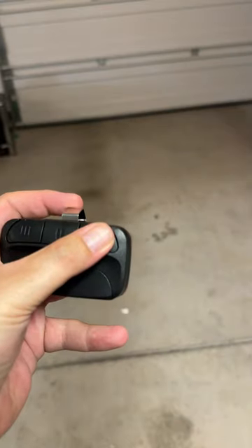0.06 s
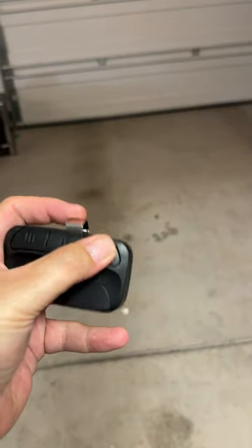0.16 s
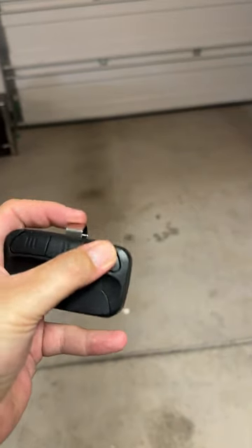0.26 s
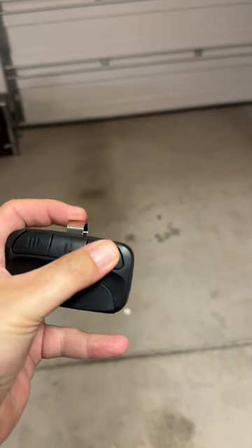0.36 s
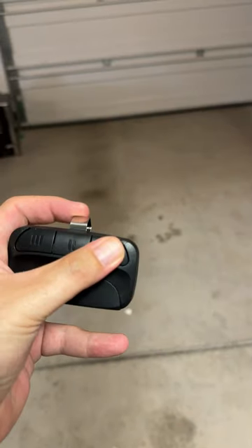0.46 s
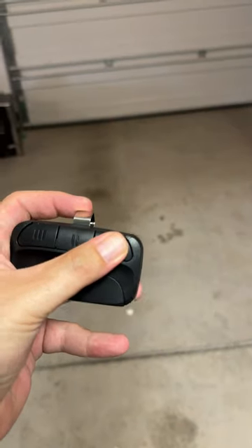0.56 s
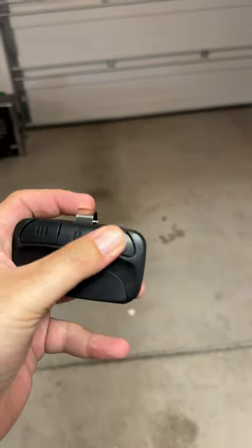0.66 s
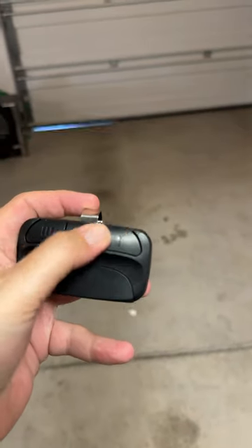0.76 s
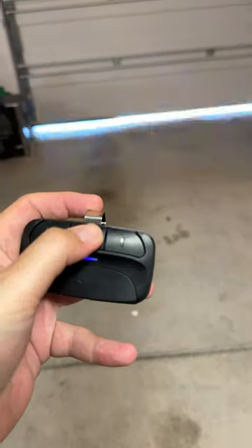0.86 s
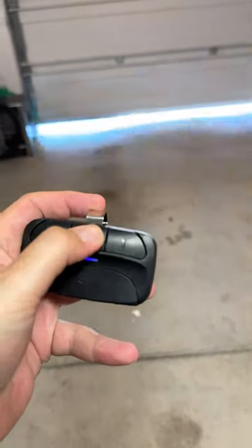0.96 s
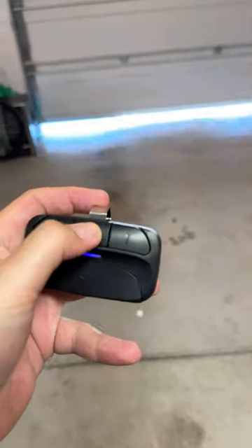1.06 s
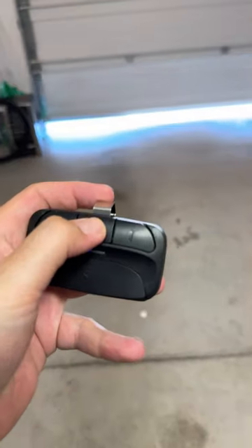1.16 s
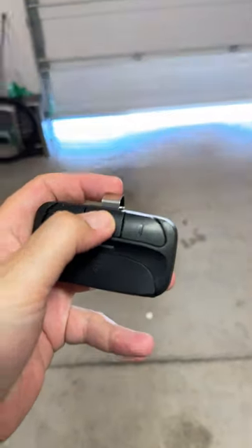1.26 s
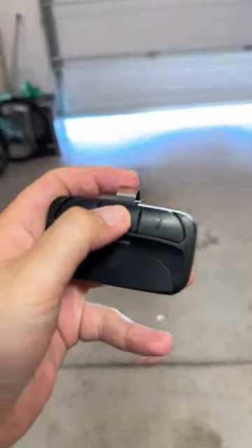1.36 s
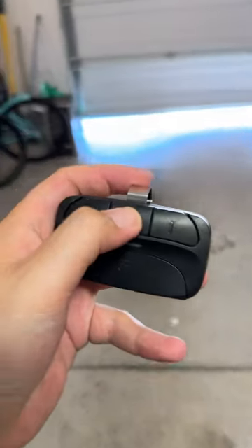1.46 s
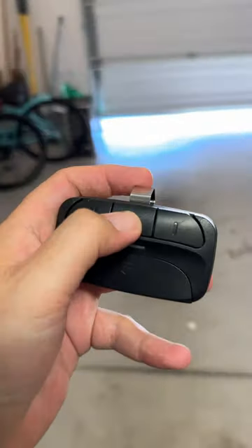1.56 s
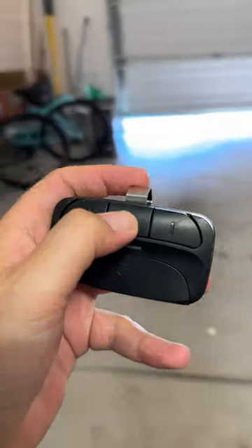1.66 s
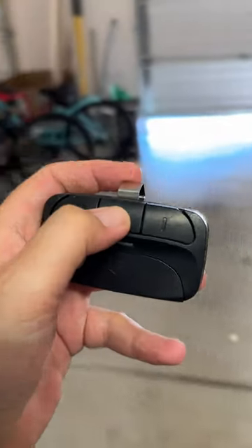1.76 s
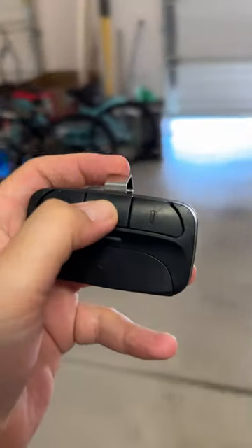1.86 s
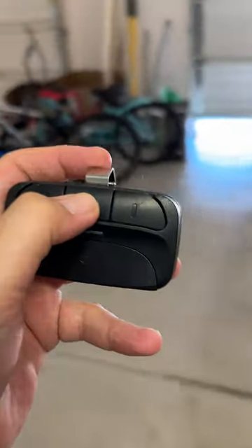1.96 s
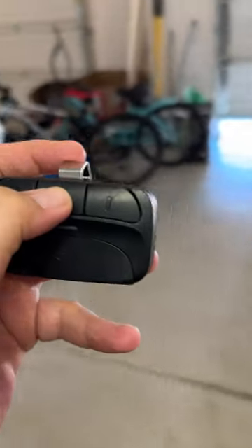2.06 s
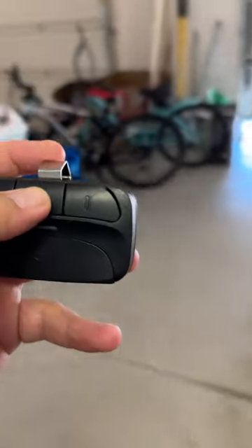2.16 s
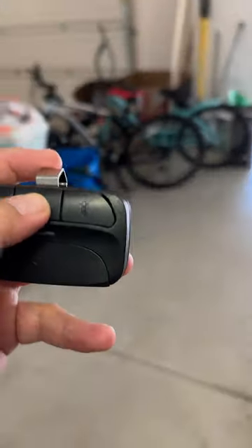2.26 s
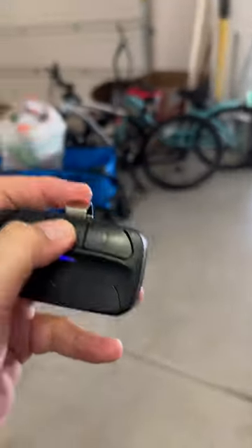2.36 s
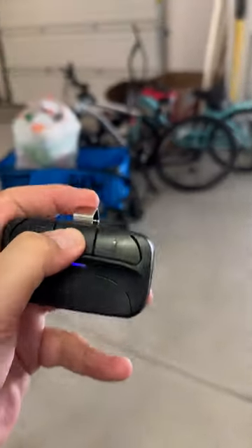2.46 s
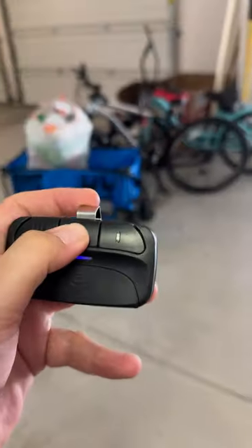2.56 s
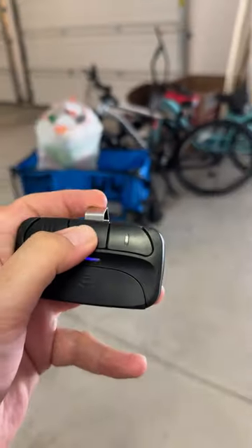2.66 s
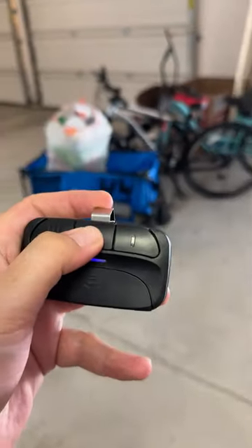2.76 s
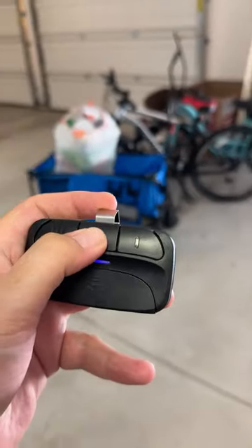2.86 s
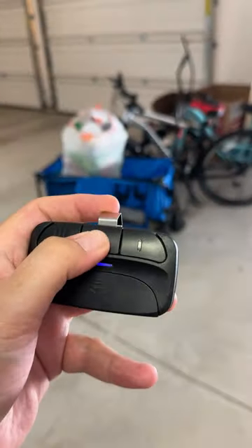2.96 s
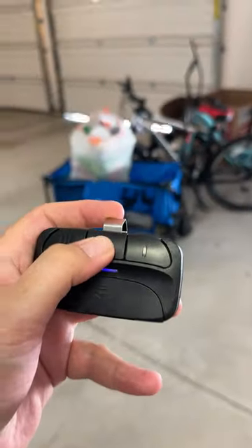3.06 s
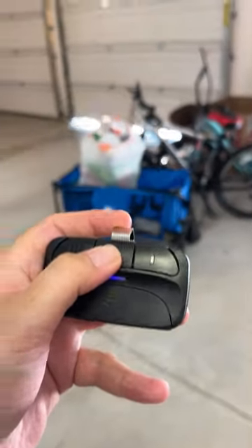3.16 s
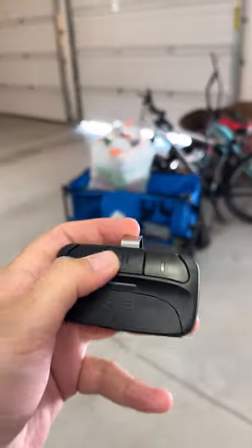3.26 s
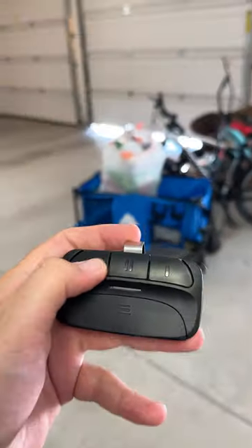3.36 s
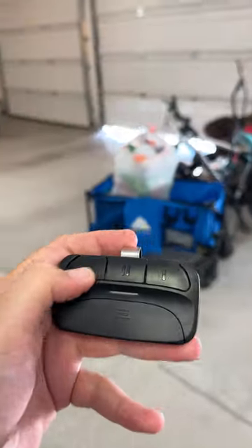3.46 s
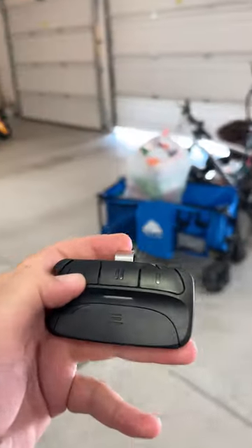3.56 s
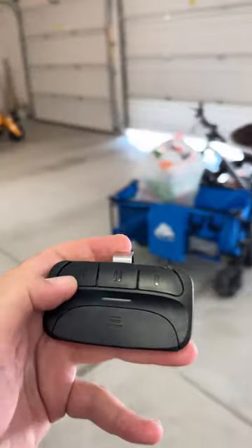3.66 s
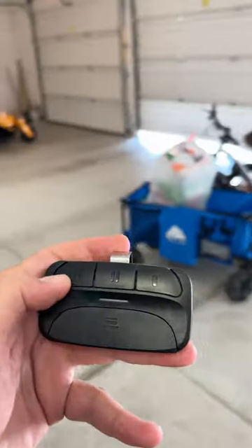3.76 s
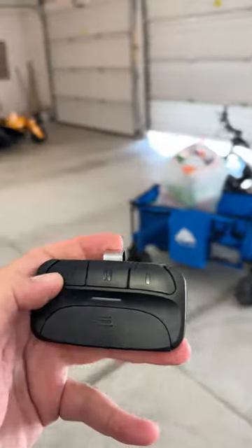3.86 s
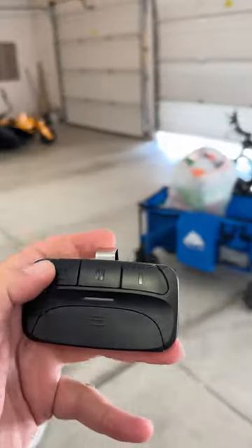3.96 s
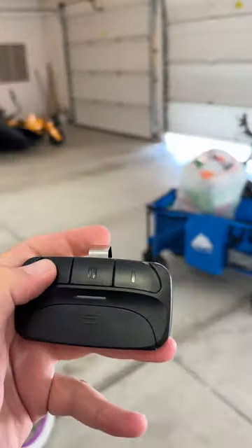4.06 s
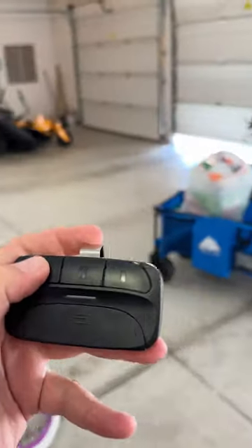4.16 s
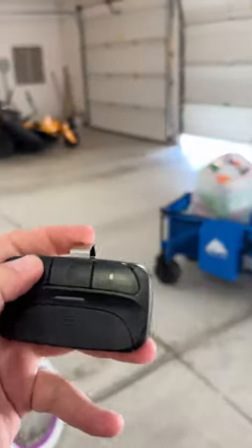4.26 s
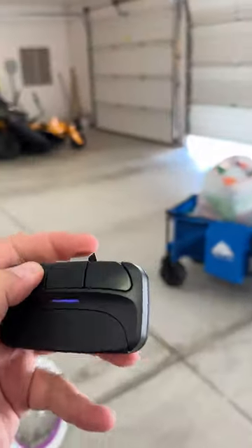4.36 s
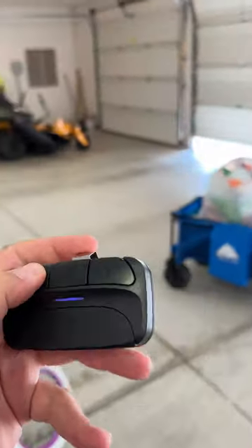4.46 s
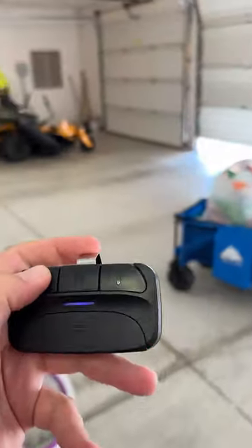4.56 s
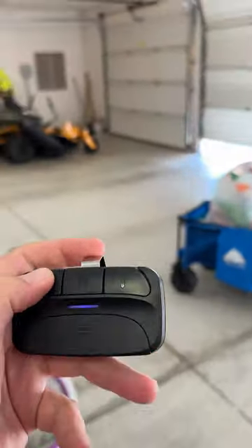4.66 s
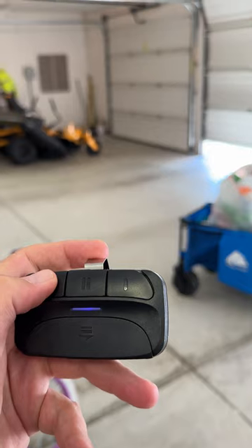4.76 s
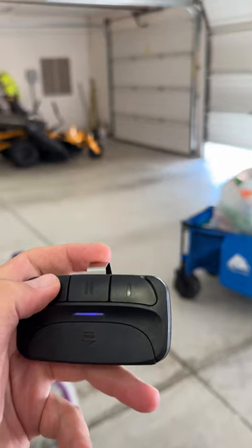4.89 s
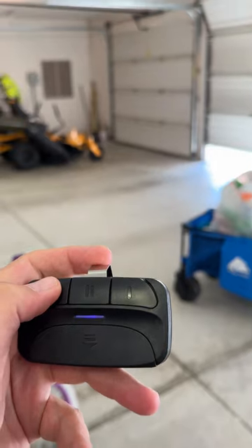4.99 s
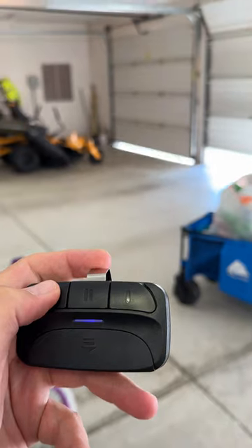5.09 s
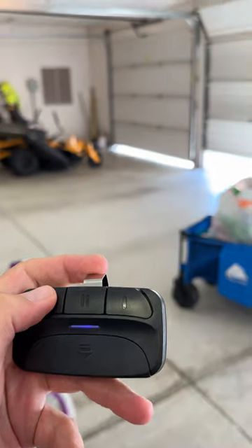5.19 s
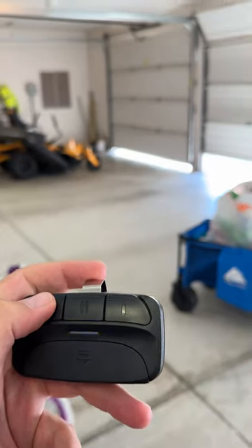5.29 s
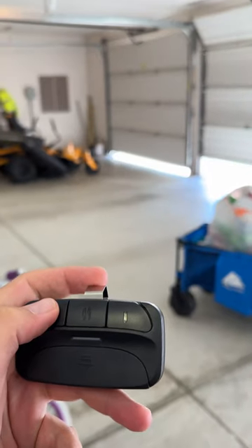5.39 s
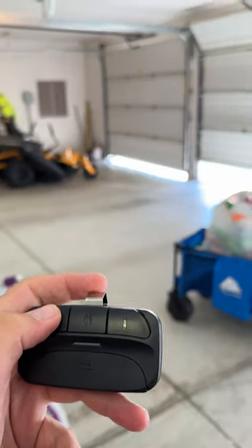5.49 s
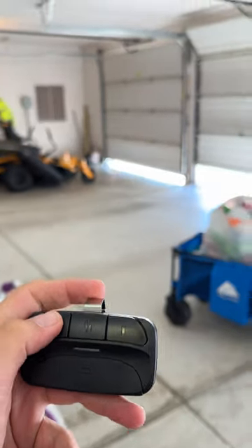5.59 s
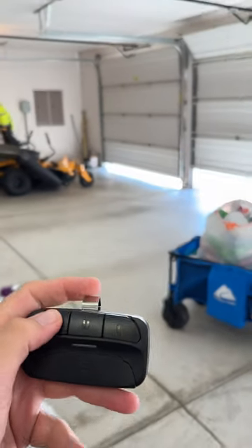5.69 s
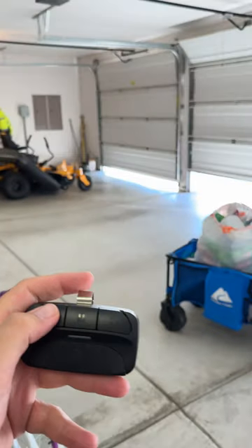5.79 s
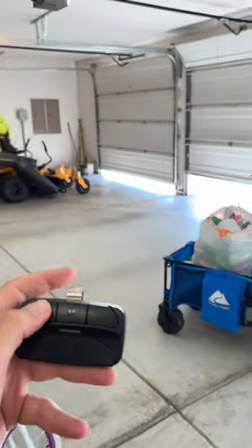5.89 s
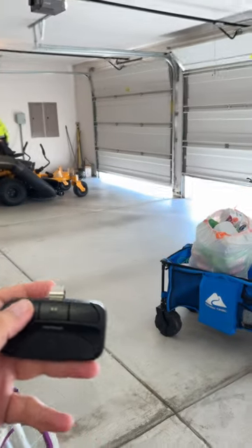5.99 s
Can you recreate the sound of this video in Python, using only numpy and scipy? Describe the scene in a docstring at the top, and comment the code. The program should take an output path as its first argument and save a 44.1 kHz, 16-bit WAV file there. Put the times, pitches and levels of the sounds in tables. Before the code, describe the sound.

In a bare, echoing garage a hand-held remote clicks sharply close to the microphone. Half a second later a door opener starts with a lurch, metal clanks and a steady low electric hum. A second click and then a third each bring in another motor and another shuddering door, so rumble, roller grinding and chain rattle thicken, with dry roller squeaks near the end.

```python
"""Remote clicks and garage doors

A hand-held remote is clicked three times in a bare garage; soon after each press another door opener starts.
Noise bursts and ringing modes make the clicks; steady tones make the motors' hum, drone and singing gears.
Shaped noise and random metal contacts make the doors rumble, grind and rattle, harder at each lurch.
Short noise bursts clank, wavering tones squeak, and the hum swells and dips through standing waves."""
import sys
import numpy as np
from scipy import signal
from scipy.fft import rfft, irfft, next_fast_len
from scipy.io import wavfile

SR = 44100
rng = np.random.default_rng(int(sys.argv[2]) if len(sys.argv) > 2 else 0)


def to_wav(s):
    """Save 16-bit WAV."""
    ch = np.atleast_2d(s).T  # columns
    pcm = np.round(np.clip(ch, -1, 1) * 32767)  # PCM
    wavfile.write(sys.argv[1], SR, pcm.astype(np.int16))


N = 266055
TIME = np.arange(N) / SR
SIZE = next_fast_len(N + SR, True)
FREQS = np.maximum(np.arange(SIZE // 2 + 1) * SR / SIZE, 1)   # never 0, so the logarithm exists


def from_db(db):
    """Turn decibels into gain."""
    return 10 ** (np.asarray(db) / 20)


def rms_one(x):
    """Scale to unit power."""
    return x / np.sqrt(np.mean(x ** 2) + 1e-20)


def in_time(rows):
    """Read each column of a time table at every sample."""
    s, *columns = np.transpose(rows)
    return [np.interp(TIME, s, column) for column in columns]


def in_frequency(rows):
    """Read each column of a frequency table at every frequency, along a logarithmic pitch axis."""
    hz, *columns = np.transpose(rows)
    return [np.interp(np.log(FREQS), np.log(hz), column) for column in columns]


def colour(x, spectrum):
    """Filter by a smooth spectrum; white noise keeps its power."""
    gain = rms_one(from_db(in_frequency(spectrum)[0]))
    return irfft(rfft(x, SIZE) * gain, SIZE)[..., :N]


def stereo_noise():
    """Two unrelated channels of white noise."""
    return rng.standard_normal((2, N))


def noise_around(hz, width, size):
    """Stereo noise of unit power from hz / width to hz * width."""
    band = signal.butter(2, [hz / width, hz * width], "band", fs=SR, output="sos")
    return rms_one(signal.sosfilt(band, rng.standard_normal((2, size))))


def drift(rate):
    """Slow random wandering of spread 1; a higher rate [Hz] wanders faster."""
    step, settle = 40, 2000   # one slow value per 40 samples; the filter's start is thrown away
    r = np.exp(-2 * np.pi * rate * step / SR)
    noise = rng.standard_normal(N // step + 2 + settle)
    slow = signal.lfilter([1], [1, -2 * r, r * r], noise)[settle:]
    return np.interp(np.arange(N) / step, np.arange(len(slow)), rms_one(slow))


def turning(hz):
    """Phase of something turning at this changing rate, from a random start."""
    return 2 * np.pi * (np.cumsum(hz) / SR + rng.random())


def lowpass(x, hz):
    """Soften the treble with a gentle one-pole filter."""
    return signal.lfilter(*signal.butter(1, hz, fs=SR), x)


def gate(start, end, edge_s):
    """Fade in, hold, fade out."""
    return np.clip(np.minimum(TIME - start, end - TIME) / edge_s, 0, 1)


def garage(x, t60_s=1, treble_t60_s=0.14):
    """Two unrelated echo tails of the bare room, as decaying noise; the treble dies sooner."""
    t = TIME[:SR]
    noise = rng.standard_normal((2, SR))
    dull = lowpass(noise, hz=3450)
    bright = noise - dull
    tail = dull * from_db(-60 * t / t60_s) + bright * from_db(-60 * t / treble_t60_s)
    build_up = 1 - np.exp(-t / 0.00096)
    tail = rms_one(tail * build_up) / np.sqrt(SR)
    return signal.fftconvolve(x[None], tail, axes=1)[:, :N]


# Faint noise of the still air: (frequency [Hz], relative level per Hz [dB])
STILL_AIR = [(25, -12), (70, -2.5), (300, -23.5), (800, -21.5), (1800, -16.5), (3000, -26), (16000, -53)]
# Low ring dying away at the start: (frequency [Hz], relative level per Hz [dB])
LOW_RING = [(170, -25), (255, 0), (315, -10), (375, 4.5), (440, -22), (530, -14), (800, -39), (1200, -28),
            (1900, -25.5), (2700, -46), (6000, -58)]


def quiet_room(air_db=-65, ring_db=-44, ring_t60=0.57):
    """Steady shaped noise for the air, and a low ring of shaped noise that fades from the start."""
    ring_level = from_db(ring_db - 60 * np.minimum(TIME, 2) / ring_t60)
    ring = ring_level * colour(stereo_noise(), LOW_RING)
    return ring + from_db(air_db) * colour(stereo_noise(), STILL_AIR)


# Dry rollers squeaking: (start [s], length [s], pitch [Hz], starting level before mixing [dB],
# octave against the note [dB], pitch wander [Hz], fade, negative where it grows [dB per s])
SQUEAKS = [(4.779, 0.035, 5750, -48, -45, 150, 1), (5.25, 0.55, 5850, -54, -37, 40, -6),
           (5.538, 0.2, 2535, -29.5, -13, 70, 72), (5.796, 0.3, 5880, -46.5, -47, 45.4, 4),
           (5.864, .035, 4490, -44, -45, 222, 0)]


def squeaks(edge_s=0.012, direct_db=-1.0, room_db=-10, flutter_db=1.5, slips_per_s=35, slip_db=4.0):
    """A dry roller sticks and slips: a rough, fluttering note with its octave, which fades or grows."""
    out = 0
    for s, length, hz, db, octave_db, wander_hz, fade in SQUEAKS:
        phase = turning(hz + wander_hz * drift(300))
        level = from_db(db - fade * np.clip(TIME - s, 0, length)) * gate(s, s + length, edge_s)
        out = out + level * (np.sin(phase) + from_db(octave_db) * np.sin(2 * phase))
    slips = np.sin(turning(slips_per_s + 4 * drift(9.3)))
    roughness = from_db(flutter_db * drift(34) + slip_db * slips)
    out = np.sqrt(2) * out * roughness
    return from_db(direct_db) * out + from_db(room_db) * garage(out)


# Hinges, chain and tracks knocking: (time [s], level before mixing [dB], pitch [Hz], clatter's 60 dB decay [s])
CLANKS = [(0.623, -34.5, 5600, 0.06), (.677, -22.5, 7330, 0.11), (.683, -26, 1440, 0.058),
          (0.76, -18.5, 9750, 0.16), (.845, -24, 2650, 0.09), (.935, -29, 6090, 0.09),
          (1.015, -27.5, 6950, .08), (1.0775, -23.5, 2080, 0.055), (1.453, -36, 5980, 0.077),
          (1.646, -39, 5500, 0.094), (2.768, -35, 8060, 0.044), (2.846, -28, 4330, 0.04),
          (2.875, -28, 6280, .08), (2.906, -26.5, 4330, 0.097), (2.985, -28, 2920, .08),
          (3.232, -32, 5760, 0.053), (3.499, -32, 6330, 0.024), (4.872, -28, 6330, 0.082),
          (4.98, -26, 3240, .08), (5.127, -27, 7300, 0.28), (5.551, -31.5, 7240, 0.36),
          (5.755, -25.5, 6350, 0.14)]


def clanks(direct_db=-9.5, room_db=-8, width=1.46, crack_db=3, crack_t60=0.0066, chatter_db=2.5,
           ring_db=-4, ring_width=1.05):
    """Each knock is a crack, a chattering scrape and a narrow ring of the steel, followed by the room."""
    out, t = np.zeros((2, N + SR)), TIME[:SR // 3]
    chatter = from_db(chatter_db * drift(110))
    for s, db, hz, t60 in CLANKS:
        at = round(s * SR)
        fading = from_db(-60 * t / t60) * np.roll(chatter, -at)[:len(t)]
        crack = from_db(crack_db - 60 * t / crack_t60)
        scrape = noise_around(hz, width, len(t)) * (fading + crack)
        ring = noise_around(hz, ring_width, len(t)) * from_db(ring_db) * fading
        out[:, at:at + len(t)] += from_db(db) * (scrape + ring)
    return from_db(direct_db) * out[:, :N] + from_db(room_db) * garage(out[0, :N])


def loose_parts(count=330, low_hz=1800, high_hz=8000, t60=0.043, spread_db=4.5):
    """Links, pins and brackets jostle at random, each pinging briefly at a pitch of its own."""
    out, t = np.zeros(N + SR), TIME[:SR // 16]
    for when, pitch, size in rng.random((count, 3)):
        at = int(when * N)
        hz = low_hz * (high_hz / low_hz) ** pitch
        level = from_db(-spread_db * np.log(size + .05) - 60 * t / t60)   # a few pings are much louder
        out[at:at + len(t)] += level * np.sin(2 * np.pi * hz * t)
    return rms_one(out[:N] + garage(out[:N]))


def run_up(start, spin_up_s=0.045):
    """A motor's strength climbs in a straight line from its start, then stays full."""
    return np.clip((TIME - start) / spin_up_s, 0, 1)


# Openers, each running on once started; levels before later trims:
# (start [s], panel rumble [dB], rollers [dB], chain rattle [dB], drone of the drive [dB])
OPENERS = [(0.627, -35.5, -46.5, -54.5, -41.5), (2.828, -37.5, -43.5, -57, -47.5),
           (4.85, -34.5, -39, -50.5, -32)]
# A door lurches; levels before later trims:
# (time [s], hold [s], panel rumble [dB], rollers [dB], chain and hinge rattle [dB])
LURCHES = [(0.633, 0.18, -30.5, -36.5, -40.5), (0.927, .16, -34.5, -36.5, -42.5),
           (1.35, 0.36, -38.5, -41.5, -49.5), (2.844, 0.13, -28, -32.5, -32), (2.865, .11, -21.5, -41, -47),
           (3.562, 0.072, -34, -43, -45.5), (4.09, 0.13, -35.5, -44, -54), (4.842, 0.17, -25, -30, -28.5),
           (5.243, 0.048, -43, -52, -36), (5.928, 0.09, -33, -36.5, -59)]
# How a lurch builds and dies, one row each for panels, rollers and chain: (attack [s], 60 dB decay [s])
LURCH_SHAPES = [(0.076, 0.83), (0.062, 2.08), (0.046, 0.81)]


def door_levels():
    """Gains of rumble, rollers and rattle: running doors and their lurches add in power."""
    gains = []
    for part, (attack_s, t60) in enumerate(LURCH_SHAPES):
        power = sum(run_up(s) * from_db(dbs[part]) ** 2 for s, *dbs in OPENERS)
        for s, hold_s, *dbs in LURCHES:
            attack = np.clip((TIME - s) / attack_s, 0, 1)
            release_db = -60 * np.maximum(TIME - s - hold_s, 0) / t60
            power = power + (attack * from_db(dbs[part] + release_db)) ** 2
        gains.append(np.sqrt(power))
    return gains


def contacts(per_s, spread_db):
    """A random stream of small metal contacts of uneven strength."""
    strength_db = spread_db * np.minimum(rng.exponential(1, N), 4)
    sizes = from_db(strength_db) * rng.choice([-1, 1], N)
    return rms_one(sizes * (rng.random(N) < per_s / SR))


def jolting_metal(spectrum, per_s, jolt_db):
    """Metal grinding or rattling: jolting contacts and a smooth wash of noise, shaped together."""
    ticks = np.array([contacts(per_s, spread_db=2.5) for side in range(2)])
    ticks = ticks * from_db(jolt_db * drift(22))
    return rms_one(colour(stereo_noise() + ticks, spectrum))


# Door panels rumbling: (frequency [Hz], relative level per Hz [dB])
RUMBLE = [(28, -30), (50, -0.5), (80, 2), (105, 1.5), (145, 4.5), (195, -4), (270, -2), (325, -3),
          (400, -4), (480, -13), (620, -18.5), (1000, -54.5)]
# Rollers grinding in the tracks: (frequency [Hz], relative level per Hz [dB])
ROLLERS = [(300, 4.5), (520, 4), (720, 8), (1000, 3.5), (1400, 2.5), (1900, -3.5), (2600, 0), (3400, -9),
           (4600, -11.5), (6500, -22.5), (16000, -56)]
# Chains and loose parts rattling: (frequency [Hz], relative level per Hz [dB])
RATTLE = [(700, -9), (2000, 5), (3200, 7), (4900, 0.5), (6000, 6), (7600, 4), (9000, 0), (10200, 1.5),
          (11500, -42), (14500, -11), (16500, -11)]


def doors(rollers_db=-.5, rattle_db=-1.4, loose_db=-4.5):
    """Panels rumble as shaped noise, rollers grind and chains rattle in many contacts, loose parts ping."""
    rumble, rollers, rattle = door_levels()
    out = rumble * from_db(1.33 * drift(7.5)) * colour(stereo_noise(), RUMBLE)
    out = out + rollers * from_db(rollers_db) * jolting_metal(ROLLERS, per_s=700, jolt_db=2.1)
    out = out + rattle * from_db(rattle_db) * jolting_metal(RATTLE, per_s=900, jolt_db=3.5)
    return out + rattle * from_db(loose_db) * loose_parts()


# Standing waves along the listener's path: (time [s], level of the hum [dB], level of its octave [dB])
HUM = [(0.75, -24, -40.5), (0.91, -21.5, -45), (1.12, -25.5, -37.5), (2.74, -23.5, -49), (2.94, -21.5, -32),
       (3.1, -22, -42), (4.64, -19, -30), (5.43, -20, -35.5), (5.52, -20, -44), (6.0, -19, -25)]
# Higher overtones: (multiple of the hum's pitch, level [dB], share of the hum's swing that it follows)
HUM_OVERTONES = [(3, -40, 0.31), (4, -53, 0.76), (6, -54.5, 1.0)]
# Gears singing: (start [s], end [s], pitch [Hz], level [dB], pitch wander [Hz])
GEARS = [(0.65, 3.65, 268, -42.5, 4.1), (1.4, 6.2, 379.7, -39.5, 3.5), (3.7, 4.9, 1390, -53, 5)]


def motors(hum_hz=120.25, drone_hz=84, drone_db=-2, gear_edge_s=0.078):
    """Windings hum at twice the mains frequency with overtones; drives drone and gears sing, wavering."""
    first, second = in_time(HUM)
    hum_phase = turning(hum_hz + 0.19 * drift(3.64))
    harmonics = [(1, first + 0.7 * drift(4.0)), (2, second + 0.7 * drift(5.9))]
    swing = first - first.mean()
    for multiple, db, share in HUM_OVERTONES:
        harmonics.append((round(multiple), db + share * swing + 2.5 * drift(4.6)))
    out = sum(from_db(db) * np.cos(k * hum_phase) for k, db in harmonics)

    drone = np.sqrt(sum(run_up(s) * from_db(db + drone_db) ** 2 for s, *door, db in OPENERS))
    drone = drone * from_db(2 * drift(6.9))
    out = out + drone * np.sin(turning(drone_hz + 2 * drift(8.2)))

    for start, end, hz, db, wander_hz in GEARS:
        level = gate(start, end, gear_edge_s) * from_db(db + 1.24 * drift(17))
        out = out + level * np.sin(turning(hz + wander_hz * drift(8.05)))
    first_start = OPENERS[0][0]   # silent until the first motor starts
    return np.sqrt(2) * run_up(first_start) ** 2 * out


# Thumb shifting on the case before the second press: (time [s], level [dB], centre [Hz], 60 dB decay [s])
THUMB_RUB = (2.226, -34, 1900, .07)


def thumb():
    """Skin rubs on plastic: a short, dry, broad burst of noise dying away."""
    s, db, hz, t60 = THUMB_RUB
    fading = from_db(db - 60 * np.clip(TIME - s, 0, 1) / t60)
    return noise_around(hz, 2, N) * (TIME >= s) * fading


# Clicks as the walls return them: (frequency [Hz], relative level per Hz [dB])
CLICK_IN_ROOM = [(500, -16.5), (1300, -4.5), (2100, 2.5), (3300, -2.5), (9000, -6), (14000, -30)]


def click_echo(room_db=-3):
    """The walls return each press and release as a wash: one kick through the room's echo tail."""
    kicks = np.zeros(N)
    for s, db, *rest in BUTTONS:
        kicks[round(s * SR)] = from_db(db + room_db)
    return colour(garage(kicks), CLICK_IN_ROOM)


# Thumb on the remote, press then release: (time [s], level over 5 ms [dB], tuning of the case under the
# grip [ratio], ring length [ratio], first bounce after [s], bounce level [dB], loss per further bounce [dB],
# contact brightness [Hz], left against right [dB])
BUTTONS = [(0.1403, -18, 1.046, 1.1, .00095, -7, 18, 11900, -1),
           (0.4175, -30, 0.88, 0.78, 0.0019, -4, 3.5, 2600, 2.5),
           (2.2799, -16.8, 1.076, .75, 0.000625, -7, 0, 3200, 1.5),
           (2.557, -28, 0.97, 0.64, 0.0039, -4.5, 6, 5228, 2.5),
           (4.2828, -13.6, 0.985, 1.4, 0.00171, -6.5, 11, 3900, 2.5),
           (4.5178, -26.5, 0.81, 0.79, .0015, -6, 7, 1400, 2.5)]
# Ringing modes of the plastic case, before tuning: (pitch [Hz], relative level [dB], 60 dB decay [s])
CASE = [(1270, -8, 0.0024), (1490, -4.3, 0.013), (1810, -6, 0.017), (2033, 1.5, 0.0084),
        (2570, -4.5, 0.008), (3270, -14.5, 0.011), (4550, -9, 0.0058), (5300, -11.5, 0.005),
        (9000, -2.5, 0.0014)]


def remote(snap_db=-22, snap_t60=0.018, bounce_shrink=0.8):
    """The button's dome snaps and settles in ever quicker bounces, each ringing the plastic case."""
    out, t = np.zeros((2, N)), TIME[:SR // 20]
    for s, db, tuning, ring, bounce_s, bounce_db, loss_db, bright_hz, pan_db in BUTTONS:
        click, delay = 0, 0
        for touch in range(4):
            age = np.maximum(t - delay, 0)
            touch_db = bounce_db - loss_db * (touch - 1) if touch else 0
            for k, (hz, mode_db, t60) in enumerate(CASE):
                fading = from_db(touch_db + mode_db - 60 * age / (t60 * ring))
                sign = (-1) ** k   # neighbouring modes start in opposite directions
                click = click + sign * fading * np.sin(2 * np.pi * hz * tuning * age)
            delay += bounce_s * bounce_shrink ** touch
        snap = from_db(snap_db - 60 * t / snap_t60) * rng.standard_normal((2, len(t)))
        click = lowpass(click, bright_hz) + snap
        energy = np.sum(click ** 2, axis=1, keepdims=True)
        click = click / np.sqrt(energy / (.005 * SR))   # unit level over 5 ms
        at = round(s * SR)
        out[:, at:at + len(t)] += click * from_db([[db + pan_db / 2], [db - pan_db / 2]])
    return out


# Microphone pair: (frequency [Hz], likeness of the two sides [0 to 1], phase by which left leads [rad])
PORTS = [(200, 1, 0), (410, 1, 0.78), (630, 0.54, 1.9), (1050, 0.61, 1.5), (1410, 0.57, 1.08),
         (2160, 0.94, 1), (2750, 0.14, 3.5), (3340, 0.38, 0.5), (5370, 0.24, 1.2), (5530, 0.98, -0.26),
         (8670, 0.54, -2), (10770, 1, -3.5), (15600, 1, -2.5)]


def microphones(direct, diffuse):
    """Diffuse sound reaches the two ports only partly alike; the phase gap of all sound changes with pitch."""
    alike, lead = in_frequency(PORTS)
    common, apart = rfft(diffuse, SIZE)
    common = common * np.sqrt((1 + alike) / 2)
    apart = apart * np.sqrt((1 - alike) / 2)
    near_left, near_right = rfft(direct, SIZE)
    left = common + apart + near_left
    right = (common - apart) * np.exp(-1j * lead) + near_right * np.exp(-1j * lead * alike)
    return irfft(np.array([left, right]), SIZE)[:, :N]


def scene():
    """Doors, room and echoes arrive as diffuse sound; motors, thumb and remote arrive directly."""
    diffuse = quiet_room() + squeaks() + clanks() + doors() + click_echo()
    direct = motors() + thumb() + remote()
    return microphones(direct, diffuse)


def record(dry):
    """Cut the top steeply above 16 kHz."""
    return signal.sosfilt(signal.ellip(10, .1, 90, 16000, fs=SR, output="sos"), dry)


dry = scene()
out = record(dry)
to_wav(out)
```